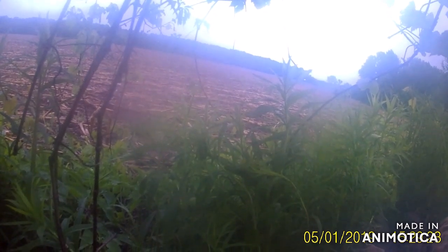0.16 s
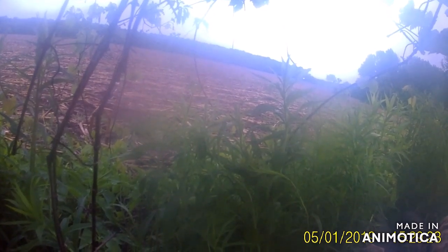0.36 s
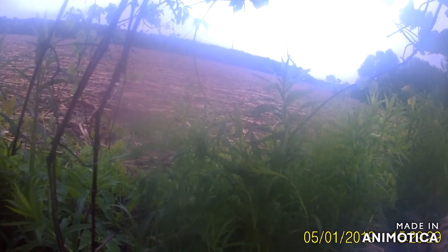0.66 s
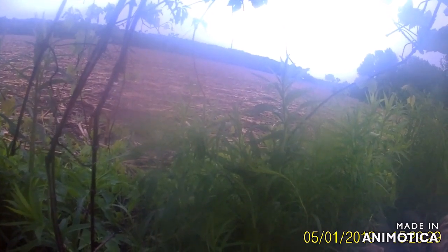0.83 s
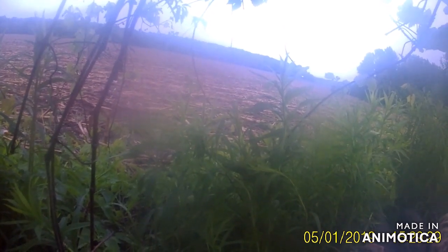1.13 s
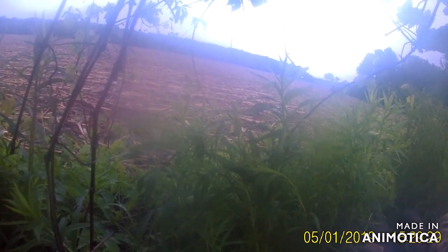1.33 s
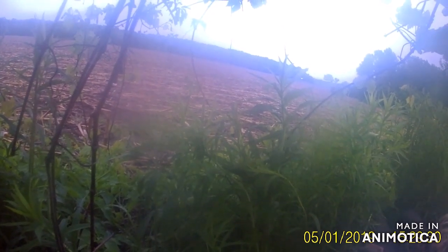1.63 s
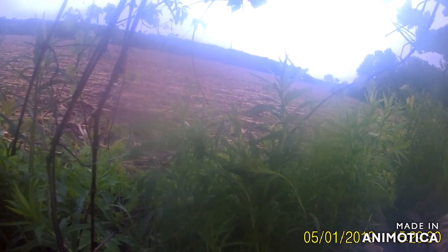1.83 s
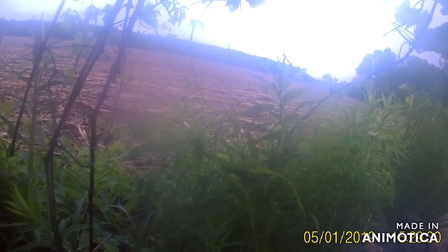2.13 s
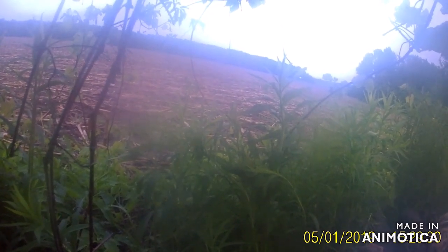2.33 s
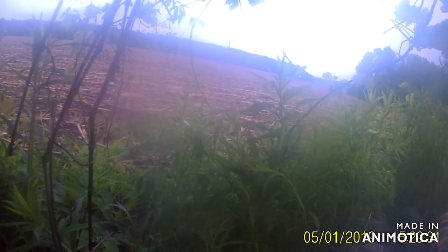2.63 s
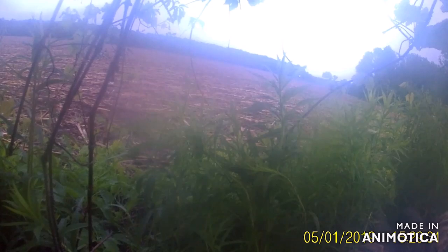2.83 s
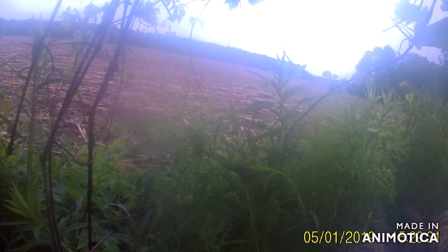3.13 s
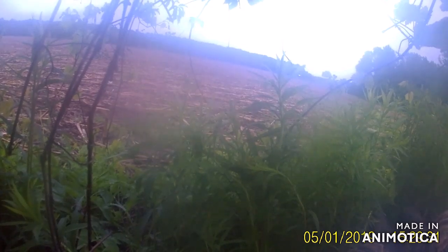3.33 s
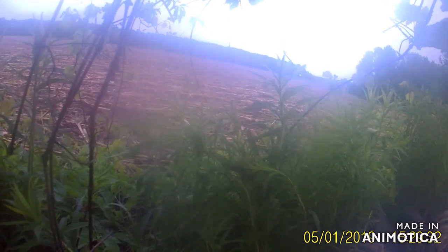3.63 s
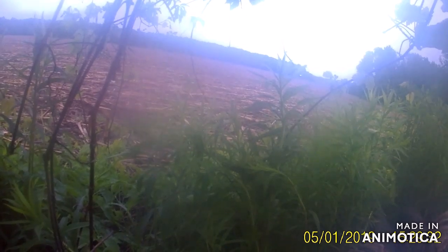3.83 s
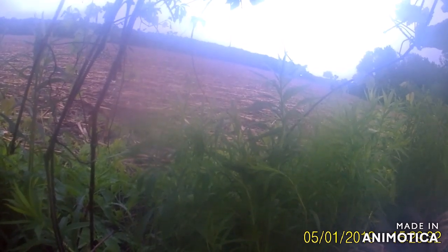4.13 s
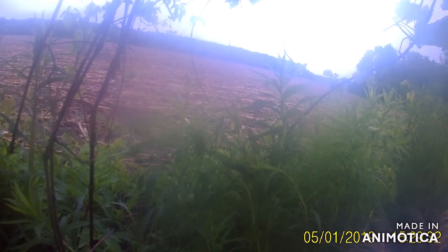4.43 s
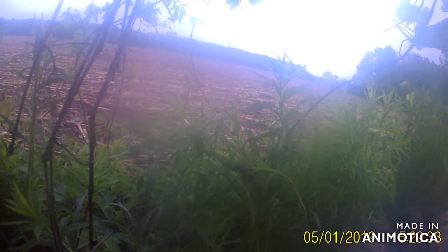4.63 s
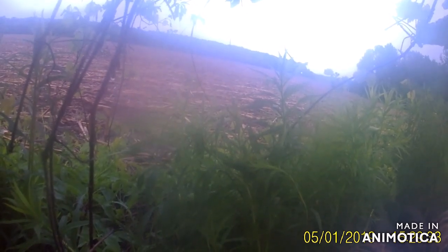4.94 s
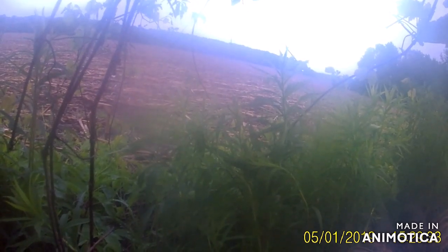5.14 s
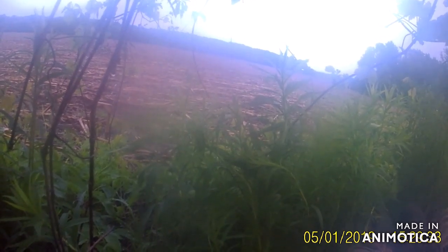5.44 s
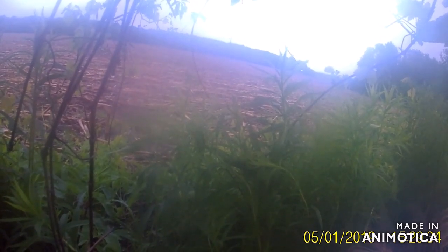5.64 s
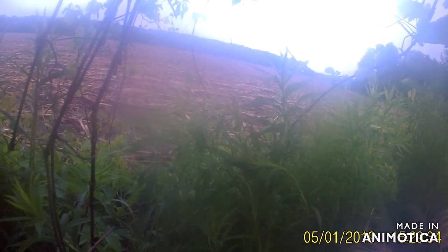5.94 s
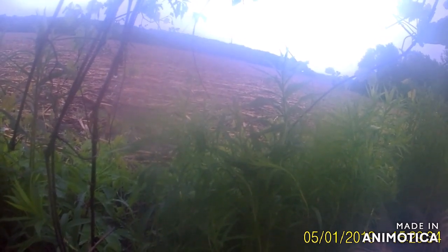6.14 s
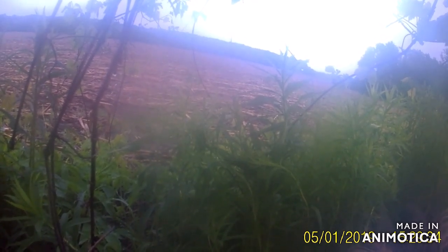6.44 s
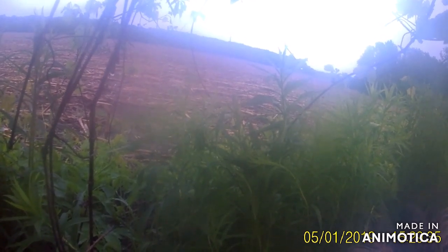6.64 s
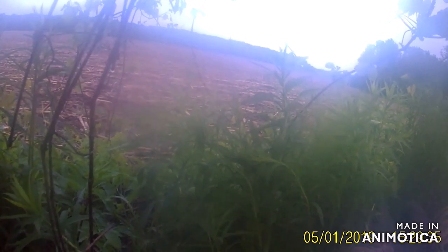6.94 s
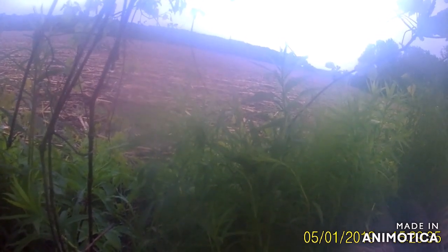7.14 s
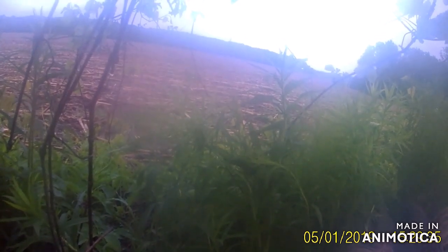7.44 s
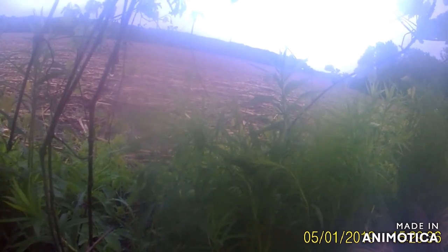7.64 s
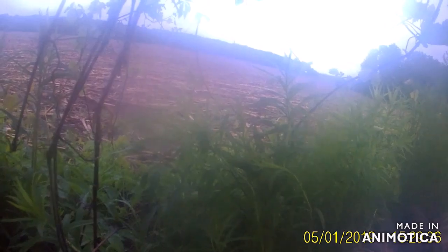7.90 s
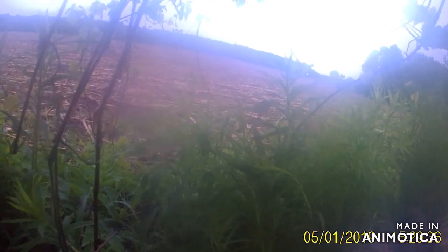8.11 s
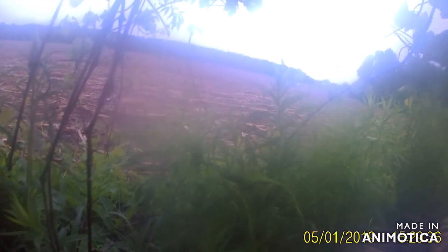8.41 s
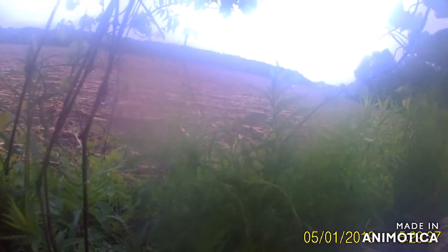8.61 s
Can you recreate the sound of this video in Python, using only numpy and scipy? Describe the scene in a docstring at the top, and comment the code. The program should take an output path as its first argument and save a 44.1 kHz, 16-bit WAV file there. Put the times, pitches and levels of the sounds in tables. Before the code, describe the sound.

A wild turkey close by, slightly right, yelps steadily in quiet open air beside a field. Each short nasal yelp starts abruptly, dips and climbs in pitch, then stops quickly. Two thin whines ending in a brief high note interrupt the run. Faint birds whistle far off from the middle on. The final yelps come faster, louder and raspier, with slight echoes from leaves and trees, then only soft air remains.

```python
"""A wild turkey yelps nineteen times at the edge of a field, in quiet air with a thin camera whine.
Each yelp scoops in pitch through a fixed throat; soft whines lead into some, and two longer whines,
near 1.5 and 5.5 s, end in a short high note. A low drone swells near 2.7 s and again near 7.7 s.
From 3.6 s far birds whistle, as arched bands of noise, and a far rush grows.
The last yelps come faster and break into a rasp of half harmonics; leaves and trees return them."""
import sys
import numpy as np
from scipy import signal
from scipy.fft import rfft, irfft
from scipy.io import wavfile
from scipy.ndimage import uniform_filter1d

SR = 44100
rng = np.random.default_rng(int(sys.argv[2]) if len(sys.argv) > 2 else 0)


def transcribe(signal):
    """Save signal, clipped to [-1, 1], as a 16-bit WAV file at the path in sys.argv[1]."""
    frames = np.atleast_2d(signal).T
    limited = np.clip(frames, -1, 1)
    pcm = np.round(limited * 32767).astype(np.int16)
    wavfile.write(sys.argv[1], SR, pcm)


N = 386661
TIME = np.arange(N) / SR  # s
EDGE_HZ = 15720  # upper limit of the recorder and of the bird's partials


def gain_of(db):
    """Decibels to amplitude."""
    return 10 ** (np.asarray(db) / 20)


def evened(x):
    """Scales to rms 1."""
    return x / np.sqrt(np.mean(x ** 2) + 1e-20)


def read(points, hz):
    """Reads a spectrum on a log-frequency axis."""
    point_hz, value = np.transpose(points)
    return np.interp(np.log(hz + 1), np.log(point_hz + 1), value)


def level(rows):
    """Gain over time from (s, dB) rows, silent outside them."""
    s, db = np.transpose(rows)
    inside = (TIME >= s[0]) * (TIME <= s[-1])
    return gain_of(np.interp(TIME, s, db)) * inside


def add(mix, s, sound):
    """Mixes a sound in at time s, without the part ahead of time zero."""
    at = round(s * SR)
    sound = sound[max(-at, 0):]
    part = mix[max(at, 0):][:len(sound)]
    part += sound[:len(part)]


def wander(size, hz):
    """Smooth chance of rms 1, no faster than about hz."""
    f = np.fft.rfftfreq(size, 1 / SR)
    slowed = rfft(rng.standard_normal(size)) * np.exp(-(f / hz) ** 2)
    return evened(irfft(slowed, size))


def fuzzy(hz, width_hz, size=N):
    """A narrow band of noise of rms 1 that follows the pitch hz."""
    turn = 2 * np.pi * np.cumsum(hz * np.ones(size)) / SR
    return evened(wander(size, width_hz) * np.cos(turn) + wander(size, width_hz) * np.sin(turn))


def air(level_db=-67, patchy_db=1.5, flicker_db=4.5, size=512):
    """Soft outdoor noise and microphone hiss: alike in the bass, wide in the treble, which flickers."""
    # colour of open air and hiss: pitch_hz, relative_level_db (per Hz)
    air_colour = [(15, -7.5), (30, -3), (85, -4.5), (160, -10.5), (300, -15.5), (550, -19.5), (1100, -16),
                  (1500, -23), (2000, -27.5), (3000, -30), (6000, -35), (9000, -38.5), (12000, -39.5),
                  (15000, -37.5)]
    # left-right likeness: pitch_hz, correlation (1 alike, -1 opposed)
    likeness = [(30, .985), (400, .94), (1000, .9), (2500, .6), (5000, .35), (8000, .05), (12000, -.45),
                (15000, -.65)]
    hz = np.fft.rfftfreq(size * 2, 1 / SR)
    frames = N * 2 // size + 5
    a, b, c, d, patches = rng.standard_normal((5, frames, len(hz)))
    patches = uniform_filter1d(patches, size=10, axis=0)
    patches = evened(uniform_filter1d(patches, size=12, axis=1))
    flicker = evened(uniform_filter1d(rng.standard_normal(frames), size=8))
    flicker = flicker[:, None] * hz / (hz + 2500)  # little in the bass
    same = np.clip(read(likeness, hz), -1, 1)
    left, other = a + 1j * b, c + 1j * d
    z = np.array([left, same * left + np.sqrt(1 - same ** 2) * other])
    z *= gain_of(read(air_colour, hz) + patchy_db * patches + flicker_db * flicker)
    z /= np.sqrt(1 + np.maximum(same, -.8))  # evens out the sum of both channels
    both = signal.istft(z, nperseg=size * 2, noverlap=size * 3 // 2, time_axis=1, freq_axis=2)[1]
    both = both[:, :N]
    return gain_of(level_db) * both / both.mean(0).std()


def distance():
    """A low drone and a soft rush from far across the field, each a narrow band of noise."""
    # low drone: time_s, level_db
    drone_levels = [(0, -83.5), (1.8, -82), (2.7, -71.5), (3.6, -82.5), (6.3, -85), (7.0, -73.5),
                    (7.7, -68), (8.4, -74), (8.77, -83)]
    # far rush around 1 kHz: time_s, level_db
    rush_levels = [(0, -82.5), (2, -83.5), (3.5, -79), (4.6, -77.5), (5.6, -74), (6.6, -76.5), (7.7, -74.5),
                   (8.77, -80)]
    drone = level(drone_levels) * fuzzy(91, 5)
    rush = level(rush_levels) * fuzzy(1100, 280)
    return drone + rush


def camera():
    """Thin electrical tones as narrow noise bands, some steady, some in short spells."""
    # steady tones: pitch_hz, width_hz, level_db
    steady_tones = [(13750, 8, -89), (7650, 150, -89)]
    # spells of a second whine: start_s, length_s
    spell_times = [(2.088, 0.133), (2.249, 0.264), (6.014, .2), (6.24, 0.1765)]
    # tones of the spells: pitch_hz, width_hz, level_db
    passing_tones = [(7162, 50, -79), (12830, 70, -83.5), (14340, 70, -89.5)]
    spells = np.zeros(N)
    for s, length in spell_times:
        add(spells, s, signal.windows.tukey(int(length * SR), .2))
    steady = sum(gain_of(db) * fuzzy(hz, width) for hz, width, db in steady_tones)
    passing = sum(gain_of(db) * fuzzy(hz, width) for hz, width, db in passing_tones)
    return steady + spells * passing


def far_birds(blur_hz=70, arch_octaves=.08):
    """Arched whistles, blurred by their way through the trees."""
    # far birds: start_s, length_s, middle_pitch_hz, glide_octaves, level_db
    bird_calls = [(3.616, 0.204, 1346, -0.25, -63), (3.719, 0.255, 1537, -.3, -72.5),
                  (4.154, 0.218, 1393, -0.136, -65), (4.816, 0.26, 1411, -0.092, -69),
                  (5.404, 0.2235, 2357, .02, -69.5), (7.297, 0.141, 2192, -.2, -79.5),
                  (7.853, .04, 2486, 0.238, -73.5), (7.878, 0.264, 1919, -0.358, -77.5),
                  (8.042, 0.038, 2510, 0.11, -75.5)]
    out = np.zeros(N)
    for s, length, middle_hz, glide, db in bird_calls:
        along = np.linspace(-1, 1, int(length * SR))
        # both ends droop below the straight glide
        hz = middle_hz * 2 ** (glide * along / 2 - arch_octaves * along ** 2)
        swell = np.cos(np.pi * along / 2)
        add(out, s, gain_of(db) * swell * fuzzy(hz, blur_hz, size=len(along)))
    return out


def foliage(x, near_db=-30, near_t60=0.2, near_hz=1500, far_db=-50, far_t60=0.49):
    """Leaves close by scatter a brief echo, mostly treble; the tree line returns a faint long one."""
    t = np.arange(SR) / SR
    near, far = rng.standard_normal((2, 2, SR))
    near, far = (taps * gain_of(-60 * t / t60) * (t > .002)
                 for taps, t60 in ((near, near_t60), (far, far_t60)))
    near = gain_of(near_db) * near / np.linalg.norm(near[0])
    far = gain_of(far_db) * far / np.linalg.norm(far[0])
    # scatter grows with frequency; near_db holds at near_hz
    leaves = np.diff(near, prepend=0) * SR / (2 * np.pi * near_hz)
    return signal.fftconvolve(x[None], leaves + far, axes=1)[:, :N]


def ports(x, lag=.9):
    """The bird sits a little to the right and reaches the left microphone port lag samples later."""
    turn = np.exp(-1j * np.pi * np.fft.rfftfreq(N) * lag)
    return irfft(rfft(x) * np.array([turn, turn.conj()]), N)


def lead_in(s, length, peak_db, hold_db=-58.5, rise_db_per_s=699.5, cut_db_per_s=2201):
    """Gain over time of one whine: a soft hold, a climb to the catch, and steep edges."""
    db = np.maximum(peak_db - rise_db_per_s * np.maximum(s - TIME, 0), hold_db)
    outside = np.maximum(TIME - s, 0) + np.maximum(s - length - TIME, 0)  # s
    return gain_of(db - np.minimum(cut_db_per_s * outside, 100))


def whines(flutter=0.47):
    """Before the voice catches, the air sounds two wavering tones of the throat."""
    # airy lead-ins, up to the moment when the voice catches: catch_s, length_s, peak_db
    lead_ins = [(0.665, 0.015, -53.5), (1.065, 0.014, -47.5), (1.535, 0.073, -37.5), (3.958, 0.0075, -50),
                (4.357, 0.0084, -56), (4.724, .01, -52), (5.074, 0.0113, -48.5), (5.484, 0.0636, -41)]
    # the two tones in them: pitch_hz, width_hz, relative_level_db
    airy_tones = [(984, 20, -3.5), (1712, 78, -3.5)]
    tones = np.zeros(N)
    for hz, width, db in airy_tones:
        wavering_hz = hz + width * wander(N, 170)
        tones += gain_of(db) * np.sin(2 * np.pi * np.cumsum(wavering_hz) / SR)
    tones = evened(tones * (1 + flutter * wander(N, 90)))
    return tones * sum(lead_in(*row) for row in lead_ins)


def throat(x, size=4096):
    """Windpipe and beak as a causal filter: the voice's slope with the resonances on top."""
    # overall colour of the voice: pitch_hz, gain_db
    voice_colour = [(300, -50), (600, -30), (900, -34), (1400, -18), (2400, -32), (3000, -51.5),
                    (4200, -53), (5200, -61), (7700, -65), (8700, -79.5), (11200, -74), (13000, -90)]
    # resonances and notches of windpipe and beak: centre_hz, half_width_hz, lift_db
    resonances = [(996, 110, 12.5), (1498.1, 402.6, 17), (1790.6, 51, 7.5), (2395, 79, 7.5), (2905, 60, -7),
                  (3533, 210, 15), (4026, 180, 6.5), (4158, 47, -7.5), (6060, 120, 4.5)]
    hz = np.fft.rfftfreq(size, 1 / SR)
    db = read(voice_colour, hz)
    for centre, width, lift in resonances:
        db = db + lift * np.exp(-((hz - centre) / width) ** 2)
    log_gain = np.log(gain_of(np.r_[db, db[-2:0:-1]]))
    # minimum phase follows from the Hilbert transform of the log gain
    ring = np.fft.ifft(np.exp(np.conj(signal.hilbert(log_gain)))).real
    return signal.oaconvolve(x, ring)[:N]


def scoop(t, length, base_hz, glide, strain):
    """Pitch of a yelp: a quick drop to the base pitch, then a slower climb as the call closes."""
    # strain raises both the opening and the closing pitch
    open_hz = 857.8 + 14 * strain
    close_hz = 905.9 + 14 * strain
    climb_s = .0093 + .64 * glide
    drop = (open_hz - base_hz) * np.exp(-(t / glide) ** 2)
    climb = (close_hz - base_hz) * np.exp((t - length) / climb_s)
    return base_hz + drop + climb


def yelp(row, top_hz=1080, shimmer=0.04, shelf_octaves=0.948, edge_hz=3700, edge_width_hz=480,
         edge_share=0.93, low_half=0.43, edge_growth=1.7, rough_hz=120, air_db=-13, strain_air_db=3.5):
    """The syrinx drops in pitch and climbs; mid-call every second pulse weakens, giving the rasp."""
    rasp_at, rasp_span = .43, .25  # shares of the call
    attack_s, swell_db, release_s = 0.003, 3, 0.0055
    s, length, base_hz, glide, effort_db, strain_db, rasp = row
    t = np.arange(int((length + .05) * SR)) / SR
    along = t / length
    hz = np.minimum(scoop(t, length, base_hz, glide, strain_db), top_hz)
    # the syrinx is uneven, more so in a raspy call
    hz = hz * (1 + (.003 + .013 * rasp) * wander(len(t), 450))
    turn = 2 * np.pi * np.cumsum(hz) / SR
    k = np.arange(2, 39)[:, None] / 2  # harmonics and the half harmonics between them
    octaves = np.log2(np.maximum(k / 2, 1))  # above the leading second harmonic
    # half harmonics are weak below the leading line and grow towards the treble
    rasp_swell = rasp * np.exp(-((along - rasp_at) / rasp_span) ** 2)
    halves = rasp_swell * np.where(k < 2, low_half, 1 + octaves / 2)
    # a forced call lifts the overtones, and a hard edge in the upper middle that grows along the call
    edge = edge_share * (1 + edge_growth * (np.minimum(along, 1) - .5))
    edge = edge * np.exp(-((k * hz - edge_hz) / edge_width_hz) ** 2)
    lift = np.minimum(octaves, shelf_octaves) + edge
    partials = np.where(k % 1, halves, 1) * gain_of(strain_db * lift) * (k * hz < EDGE_HZ)
    # the membranes close unevenly: the higher a partial and the raspier the call, the more it frays
    fray = np.clip((.22 + .85 * rasp) * octaves ** 2 / 2, 0, 1)
    chance = np.array([wander(len(t), rough_hz) + 1j * wander(len(t), rough_hz) for _ in k]) / np.sqrt(2)
    waves = ((np.sqrt(1 - fray ** 2) + fray * chance) * np.exp(1j * k * turn)).real
    pulses = (partials * waves).sum(0) * (1 + shimmer * wander(len(t), 130))
    # air hisses through once a cycle, more when the call is forced
    hiss = np.diff(rng.standard_normal(len(t) + 1)) * (1 + np.cos(turn))
    hiss = hiss * gain_of(air_db + strain_air_db * strain_db)
    # abrupt start, slight swell, quick release
    pressure = gain_of(effort_db + swell_db * (np.minimum(along, 1) - .5))
    attack = 1 - np.exp(-(t / attack_s) ** 2)
    release = (1 - np.tanh((t - length) / release_s / 2)) / 2
    return s, pressure * attack * release * (pulses + hiss)


def scene():
    """The turkey in front of the quiet field; the camera tones are drawn anew for each channel."""
    # nineteen yelps and two short high notes, one row a call, levels ahead of the throat:
    # start_s, length_s, base_pitch_hz, glide_s, effort_db, strain_db (overtone lift per octave),
    # rasp (share of half harmonics)
    calls = [(-0.0098, 0.0976, 615.5, 0.0296, -30, -18.5, 0.0216),
             (0.2883, 0.1127, 675.5, 0.0037, -21.5, -5.5, 0.0545),
             (0.656, 0.1157, 719.5, 0.00858, -18.5, -2.5, 0.0227),
             (1.0617, 0.10887, 714.6, 0.0126, -17.5, -1.5, 0.0101),
             (1.534, 0.0332, 898.2, 0.007, -24, 0, 0.0434), (1.9085, 0.1092, 676.3, 0.0075, -21, 2, 0.04),
             (2.3309, 0.10637, 672.9, 0.00706, -22, 1.5, 0.205),
             (2.713, 0.10944, 700, 0.00913, -20, 3, 0.039),
             (3.12, 0.10855, 696.4, 0.0102, -20.5, 2, 0.0354),
             (3.539, 0.1197, 691.5, 0.0096, -21.5, 0.4, 0.0546),
             (3.9566, 0.1031, 689.5, 0.02686, -18.5, 0.97, 0.07),
             (4.3518, 0.10236, 676.6, 0.011, -19.5, 1.18, 0.1445),
             (4.7258, 0.0962, 679.9, 0.00516, -19.5, 0.23, 0.35),
             (5.0763, 0.0885, 684.1, 0.0074, -18.3, 0.5, 0.098),
             (5.488, 0.0162, 856, 0.01696, -14.5, -2, 0.11),
             (5.8203, 0.08936, 656.6, 0.02007, -22.5, 1.52, 0.071),
             (6.15, 0.08225, 662.7, 0.0127, -21.5, 4, 0.381),
             (6.4649, 0.09355, 670, 0.0084, -20.5, 5.5, 0.592),
             (6.7922, 0.0824, 670, 0.00952, -19, 5.5, 0.53),
             (7.0875, 0.08783, 679.6, 0.01067, -17.5, 7.5, 0.474),
             (7.4047, 0.09374, 672.2, 0.01675, -15.5, 6, 0.314)]
    syrinx = np.zeros(N)
    for row in calls:
        add(syrinx, *yelp(row))
    turkey = throat(syrinx) + whines()
    background = air() + distance() + np.array([camera(), camera()]) + far_birds()
    return background + foliage(turkey) + ports(turkey)


def record(dry):
    """The recorder's band limit: a steep low-pass at EDGE_HZ."""
    low_pass = signal.firwin(1023, EDGE_HZ, window=("kaiser", 9), fs=SR)
    return signal.oaconvolve(dry, low_pass[None], "same")


dry = scene()
out = record(dry)
transcribe(out)
```